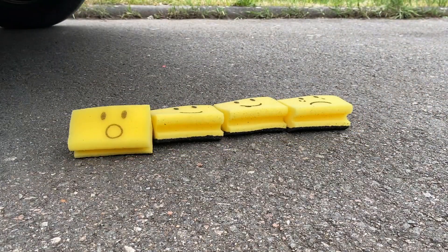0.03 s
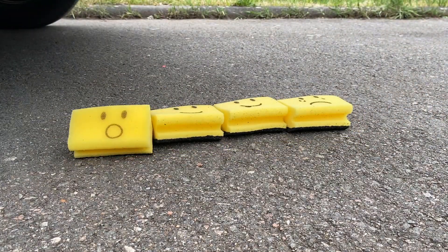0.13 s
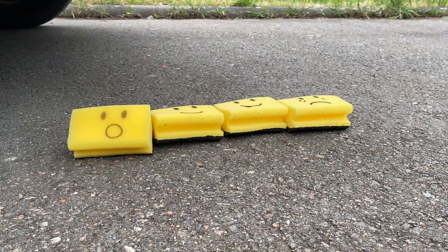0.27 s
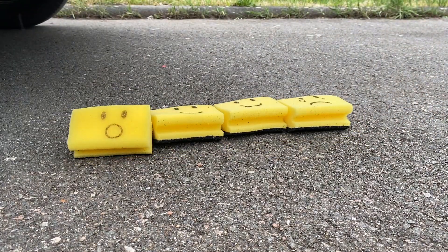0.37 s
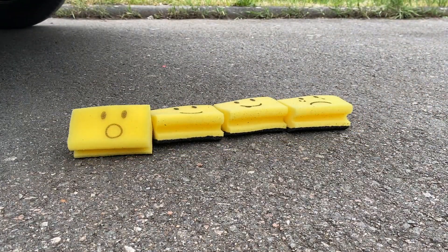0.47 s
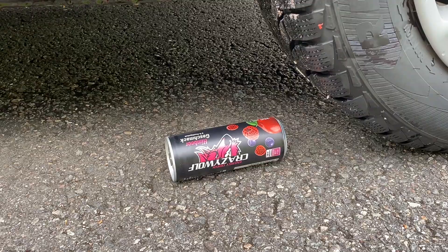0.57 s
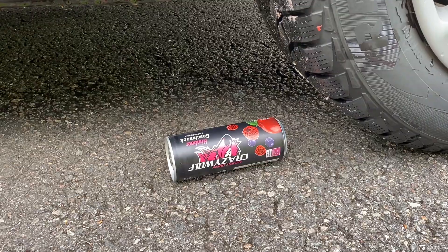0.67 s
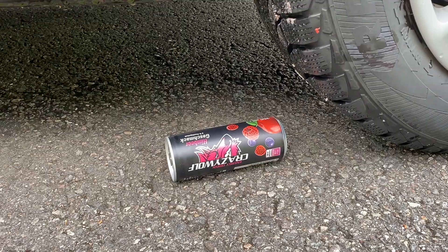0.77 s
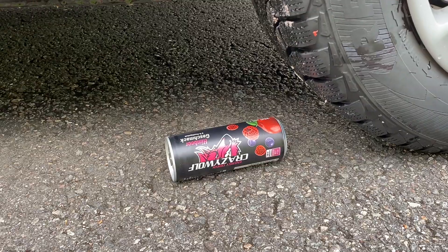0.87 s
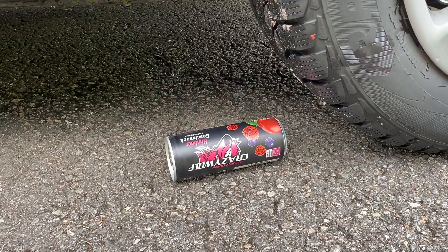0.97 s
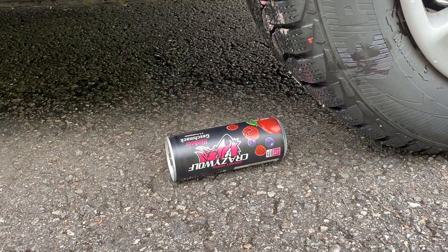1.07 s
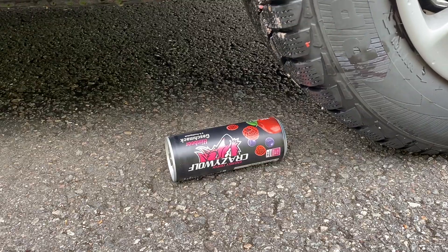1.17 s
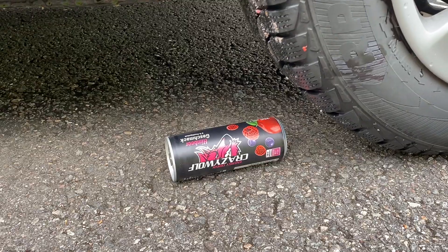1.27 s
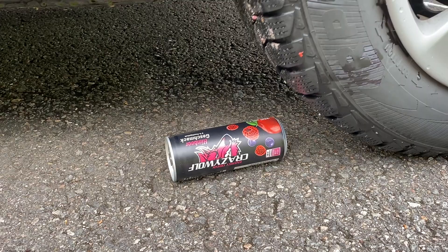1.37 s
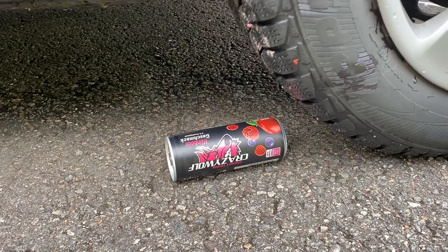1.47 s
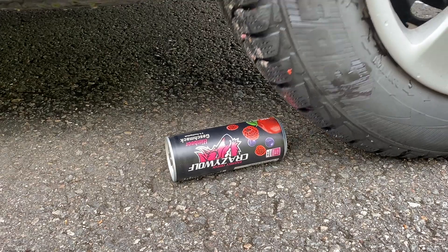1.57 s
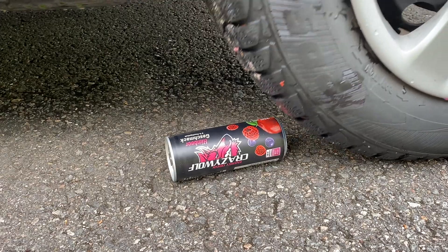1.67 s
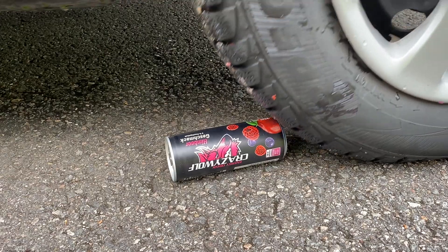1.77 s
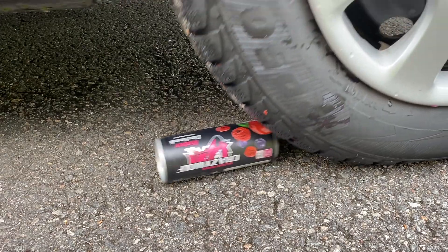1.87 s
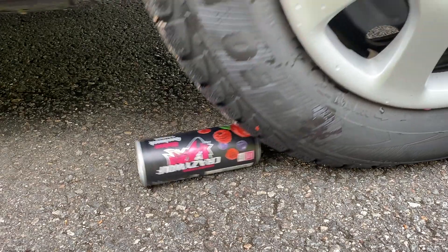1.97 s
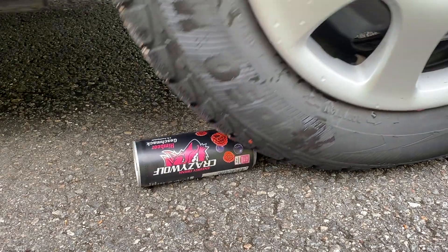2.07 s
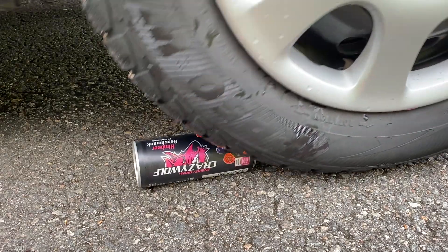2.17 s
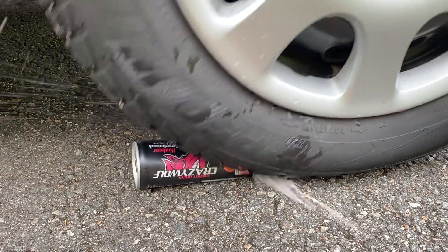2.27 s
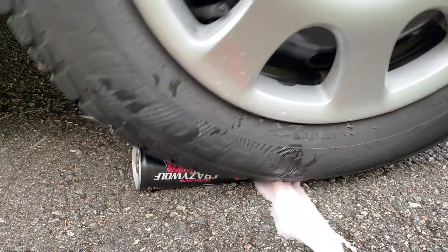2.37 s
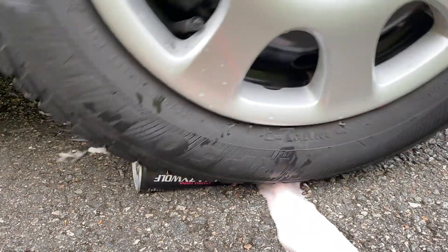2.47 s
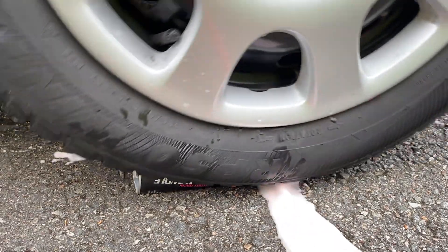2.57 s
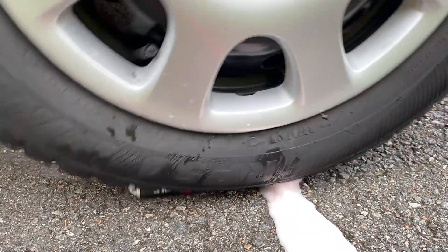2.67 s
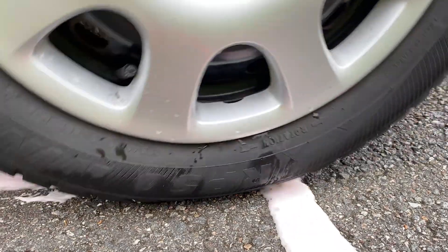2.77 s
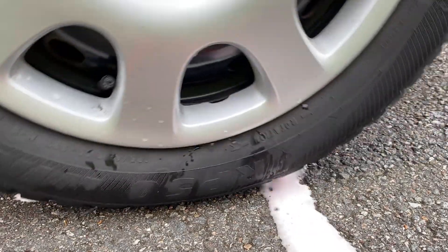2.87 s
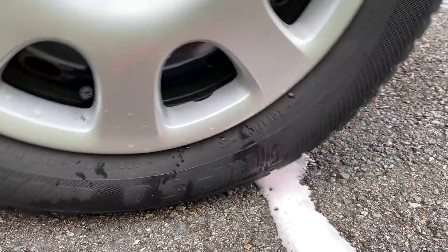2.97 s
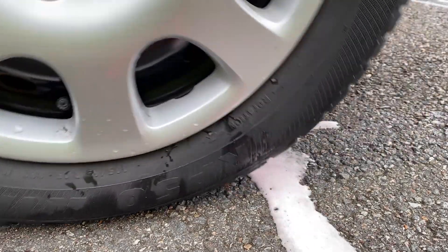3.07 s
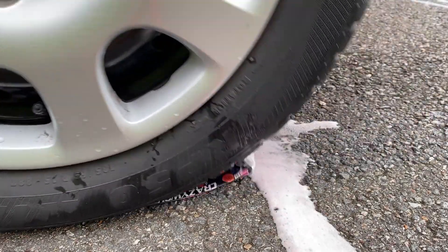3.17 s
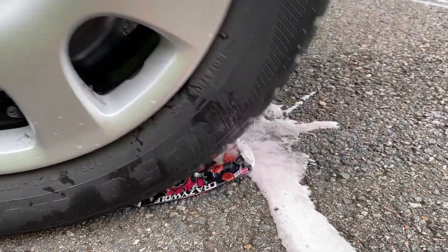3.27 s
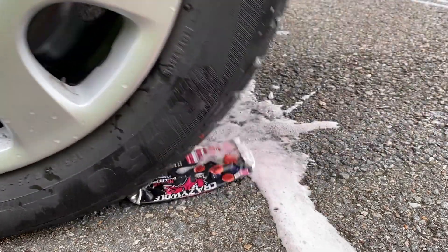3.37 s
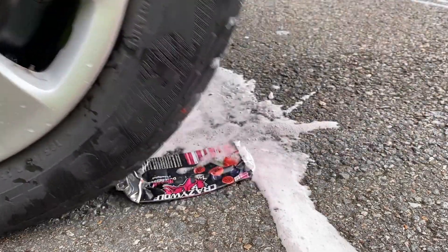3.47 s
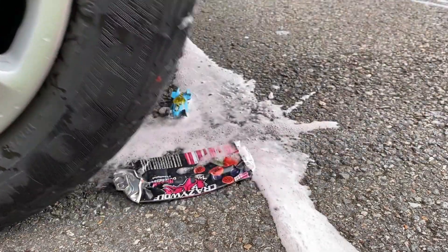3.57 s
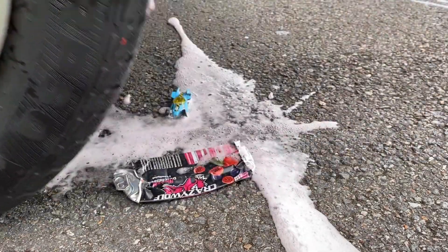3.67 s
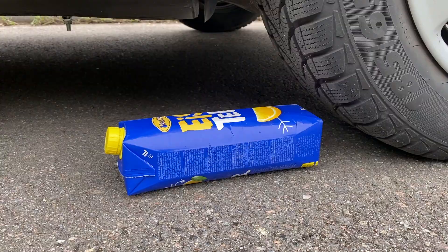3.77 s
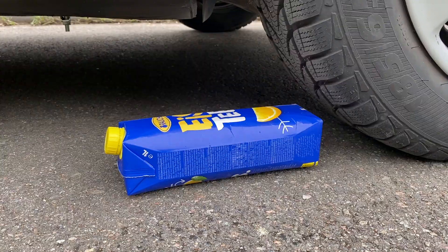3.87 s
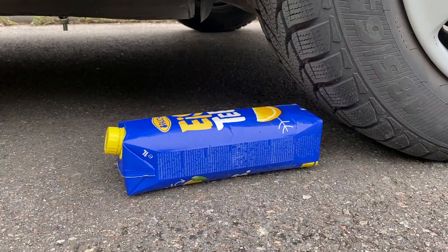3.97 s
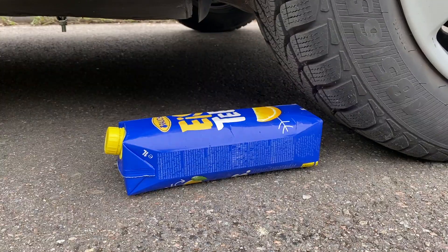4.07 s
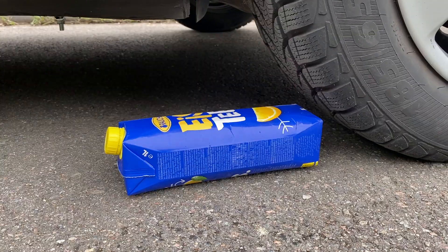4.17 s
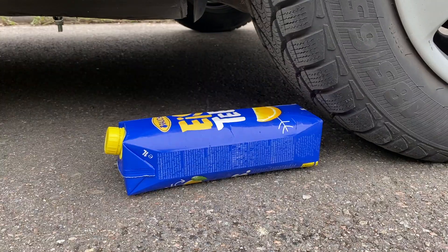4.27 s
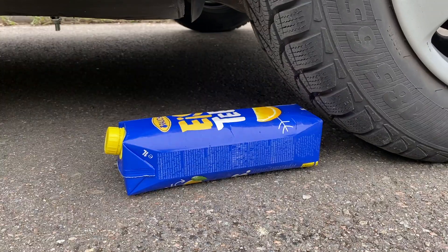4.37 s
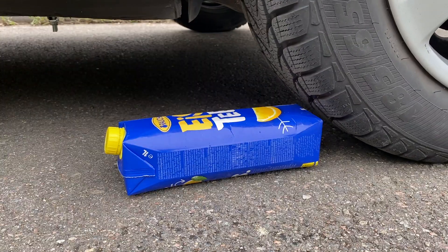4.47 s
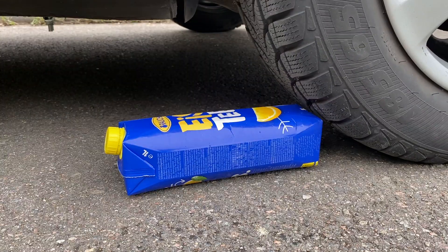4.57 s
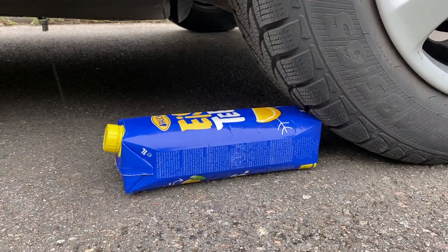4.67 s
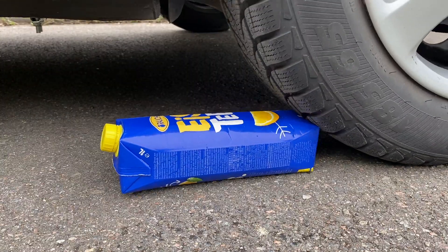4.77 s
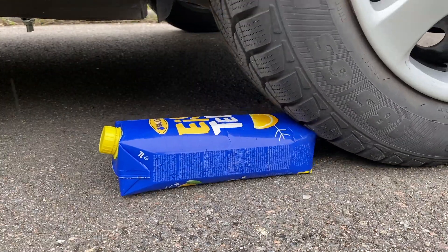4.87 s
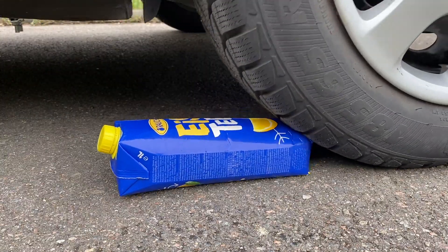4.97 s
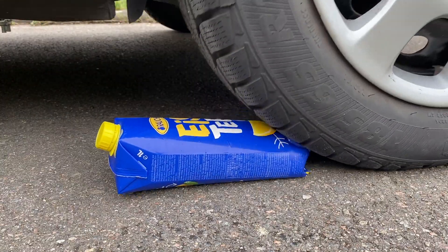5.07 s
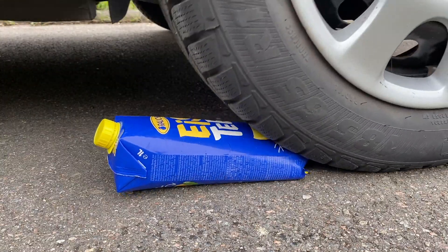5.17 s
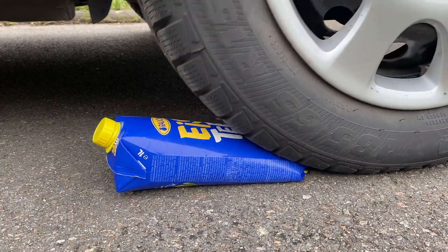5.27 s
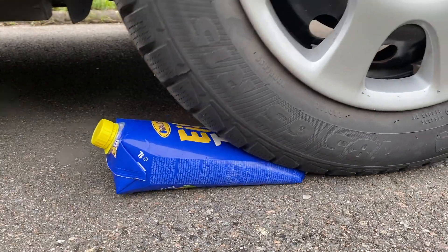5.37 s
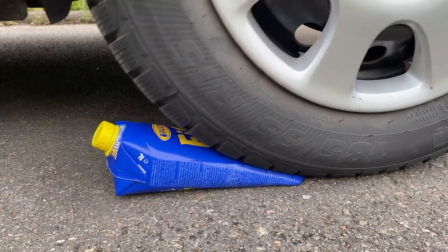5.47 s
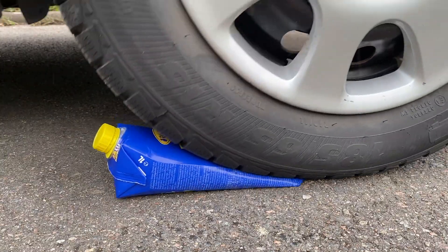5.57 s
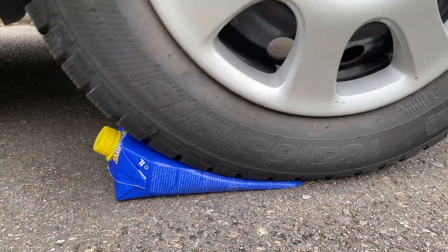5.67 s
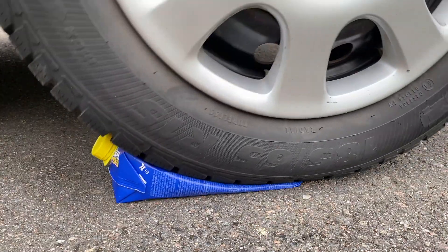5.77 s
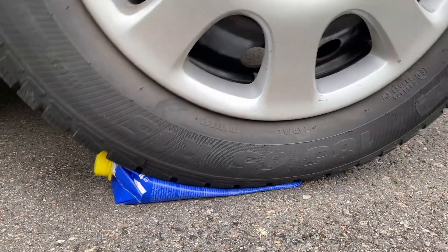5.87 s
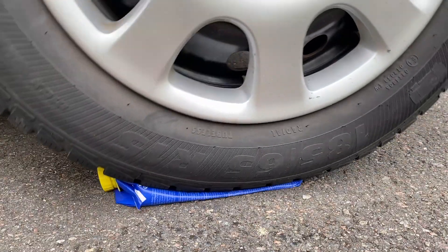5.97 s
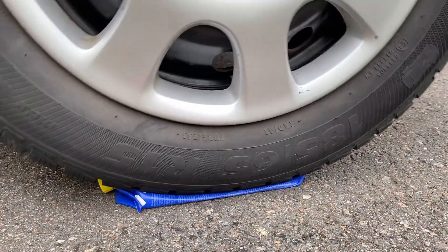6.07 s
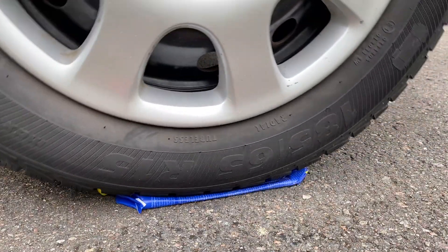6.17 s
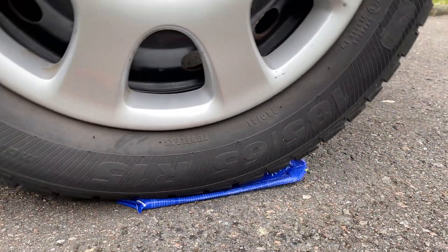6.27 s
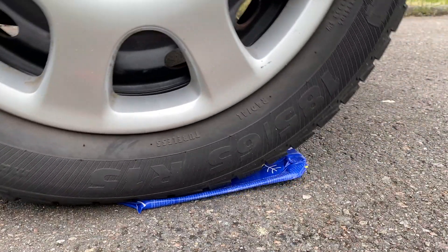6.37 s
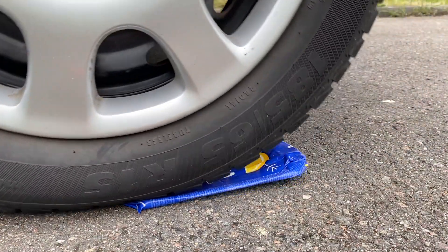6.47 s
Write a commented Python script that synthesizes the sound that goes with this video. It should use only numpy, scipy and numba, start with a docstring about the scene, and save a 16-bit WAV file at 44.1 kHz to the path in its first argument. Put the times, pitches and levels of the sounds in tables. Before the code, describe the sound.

Outdoors on asphalt, close to a phone, a car idles with a low throbbing exhaust and soft valve clatter. A tyre crushes a full metal can in ringing crunches, deep pops and short wet sprays. After an abrupt shot change, a carton ticks and creaks, then its air rushes out in hiss and wavering whistles, ending in sharp cracks.

```python
"""Car crushing a can and a carton

An idling car creeps over a full drink can, then an empty carton, a metre from a phone on the asphalt.
Each can fold is ringing wall modes, a thud and a crack; falling thumps and droplet noise burst out.
The carton's creases crack and its air escapes as hiss and whistles through a leak.
Behind them, firings ring the exhaust, valves clatter and grit and foam fizz; the car's sound shifts
at about 0.6 and 3.8 s, as three shots follow each other."""
import sys
import numpy as np
from scipy import signal
from scipy.fft import rfft, irfft, next_fast_len
from scipy.io import wavfile
from scipy.ndimage import uniform_filter1d
from numba import njit

SR = 44100
rng = np.random.default_rng(int(sys.argv[2]) if len(sys.argv) > 2 else 0)


def bounce(signal):
    """Save signal as a 16-bit WAV file at the path given by the first command-line argument."""
    frames = np.transpose(np.atleast_2d(signal))
    limited = np.clip(frames, -1, 1)
    pcm = np.round(limited * 32767).astype(np.int16)
    wavfile.write(sys.argv[1], SR, pcm)


N = 287532
SIZE = next_fast_len(N, True)
T, HZ = np.arange(N) / SR, np.fft.rfftfreq(SIZE, 1 / SR)  # time of each sample, pitch of each spectral bin


def undb(db):
    """Turn decibels into a gain."""
    return 10 ** (np.asarray(db) / 20)


def unit(x):
    """Scale to an rms of 1."""
    return x / np.sqrt(np.mean(x ** 2))


def peak(x):
    """Scale to a highest point of 1."""
    return x / abs(x).max()


def curves(table):
    """Turn each column after the time into a curve, one value a sample."""
    s, *rest = np.transpose(table)
    return [np.interp(T, s, column) for column in rest]


def along(points, log=True):
    """Read (pitch_hz, value) points at every spectral bin."""
    f, value = np.transpose(points)
    return np.interp(np.log(HZ + 1), np.log(f + 1), value) if log else np.interp(HZ, f, value)


def colour(x, points, lo_hz, hi_hz):
    """Shape the spectrum, with rms 1 counted inside the band lo-hi."""
    spectrum = rfft(x, SIZE) * undb(along(points))
    inside = spectrum[(HZ > lo_hz) & (HZ < hi_hz)]
    return irfft(spectrum, SIZE)[:N] / (np.sqrt(2 * np.sum(abs(inside) ** 2)) / SIZE)


@njit
def svf(x, hz, width):
    """State-variable band-pass with a moving centre, gain 1 there."""
    y, b, l = np.empty(len(x)), 0., 0.
    for i in range(len(x)):
        g, k = np.tan(np.pi * hz[i] / SR), width / hz[i]
        v = (b + g * (x[i] - l)) / (1 + g * (g + k))
        b, l, y[i] = 2 * v - b, l + 2 * g * v, k * v
    return y


def band(x, hz, width):
    """Band-pass at a fixed or moving pitch."""
    return svf(x, np.zeros(len(x)) + hz, float(width))


def band_twice(x, hz, width, second_width):
    """Two band-passes in a row, for steeper sides."""
    return band(band(x, hz, width), hz, second_width)


def noise_band(hz, width, second_width, samples=N):
    """A band of noise with rms 1."""
    return unit(band_twice(rng.standard_normal(samples), hz, width, second_width))


def walk(rate):
    """Smooth random wander with rms 1: levels held 1 / rate seconds and smoothed twice."""
    k = int(SR / rate)
    steps = np.repeat(rng.standard_normal(N // k + 1), k)
    return unit(uniform_filter1d(uniform_filter1d(steps, k), k)[:N])


def grains(rate, spread_db, tail_s):
    """Noise whose level jumps with random tiny bursts that die away."""
    kicks = (rng.random(N) < rate / SR) * undb(spread_db * rng.exponential(size=N))
    bursts = signal.lfilter([1], [1, -np.exp(-1 / (tail_s * SR))], kicks)
    return unit(rng.standard_normal(N) * (1 + bursts))


def while_on(start, end, edge_s):
    """1 from start to end, with short ramps inside the ends."""
    return np.clip(np.minimum(T - start, end - T) / edge_s, 0, 1)


def bumps(rows):
    """Sum of smooth swells or dips (centre_s, change_db, half_length_s)."""
    return sum(db * np.cos(np.pi / 2 * np.clip((T - s) / half, -1, 1)) ** 2 for s, db, half in rows)


def buckle(events, modes, fold_t60, sharp_thud_db, thud_gain, top_share_db, wide, reach,
           crack_share, boost_db, snap_db):
    """Each fold rings the wall modes near its centre, pushes air as a thud and cracks as a noise burst."""
    out, t = np.zeros(N + 3000), T[:3000]
    f, mode_db, ring_s = (column[:, None] for column in np.transpose(modes))
    for s, peak_db, hz, crack_db, crack_hz in events:
        thud_db = sharp_thud_db - thud_gain * crack_db  # dull, wide folds push more air
        # High cracks reach further into the top.
        top_db = crack_db + top_share_db + 8 * np.log2(crack_hz / 4000)
        t60 = fold_t60 + .002 * peak_db  # weak folds die sooner
        fade = undb(-60 * t / max(t60, .011))
        chance, noise = rng.standard_normal((3, len(modes), 1)), rng.standard_normal((2, len(t)))

        # Folds above -12 dB drop in pitch, nearer to 30 % the stronger they are.
        sag, sag_s = .3 * np.clip(1 - peak_db / -12, 0, 1), .006
        bent_t = (1 - sag) * t + sag * sag_s * (1 - np.exp(-t / sag_s))  # time as the sagging modes count it
        distance = np.log2(f / hz)  # octaves from the fold's centre
        gain = np.sign(chance[2]) * undb(mode_db + 3.4 * chance[0] - reach * distance ** 2)
        tones = np.sin(2 * np.pi * f * (1 + 0.065 * chance[1]) * bent_t)
        ring = np.sum(gain * tones * undb(-60 * t / ring_s), axis=0)
        rustle = band_twice(noise[0] * fade, hz, 0.51 * hz, 1.5 * hz)
        ring = peak(ring) * fade + 0.47 * peak(rustle)
        ring *= 1 - np.exp(-t * hz / 0.27)  # the fold takes part of a cycle to travel

        thud_hz = np.array([[120], [290]]) * (1 + 0.26 * np.tanh(chance[2, :2]))
        thud = np.sin(2 * np.pi * thud_hz * t).sum(axis=0)
        thud *= 0.99 * (1 - np.exp(-t / 0.0019)) * undb(-60 * t / 0.048)

        snap = noise[1] * (undb(-60 * t / .0045) + crack_share * fade ** .8)
        snap[0] = 5 * np.sign(chance[0, 0, 0])  # a tick opens the snap
        crack = peak(band_twice(snap, crack_hz, wide * crack_hz, 2 * wide * crack_hz))
        top = peak(band(band(snap, 11400, 8400), 11700, 9100))

        one = peak(ring) + undb(thud_db) * thud + undb(crack_db + snap_db) * crack
        one += undb(top_db + snap_db + 6.5) * top
        start = int((s + 0.000995) * SR)  # the fold sounds 1 ms after its listed time
        out[start:start + len(t)] += undb(peak_db + boost_db) * one
    return out[:N]


def can_folds():
    """The can's thin metal wall buckles and rings."""
    # Folds, levels before the gains below: start_s, ring_peak_db, ring_centre_hz,
    # crack_db (against the ring), crack_centre_hz
    dents = [(1.967, -37, 515, 0, 4180), (1.998, -35, 673, 2, 5400), (2.028, -9, 820, -3, 2200),
             (2.048, -27, 646, 2, 5870), (2.136, -22.5, 800, -19, 4210), (2.2105, -5.5, 900, -17, 2407),
             (2.218, -11, 816, -10, 2930), (2.221, -12, 1000, -8, 3910), (2.279, -24, 680, -20, 2500),
             (2.307, -27, 1350, -25, 2500), (2.314, -22, 1290, -20, 2400), (2.333, -26, 1540, -11, 7230),
             (2.343, -25, 1480, -22, 2500), (2.36, -26, 1490, -22, 2500), (2.383, -26, 1560, -8, 2400),
             (2.401, -31, 896, 2.5, 3500), (2.423, -28, 1200, -15, 2600), (2.432, -18.5, 1190, -13, 2930),
             (2.477, -12, 1200, -1, 3500), (2.508, -15, 1100, -3, 5260), (2.522, -20, 1700, -7, 2470),
             (2.571, -24, 1010, -20, 2400), (2.594, -11, 700, -24, 2500), (2.605, -5.5, 680, -24, 6260),
             (2.61, -7, 1000, -28, 3140), (2.614, -13, 805, -22, 2410), (2.625, -10, 700, -16, 2200),
             (2.6675, -7, 760, -7, 4000), (2.675, -13, 900, 0, 7100), (2.71, -24, 900, -12, 2500),
             (2.745, -19, 1686, 3, 3000), (2.784, -28, 1419, -24, 2400), (2.806, -22, 1100, -15, 3320),
             (2.832, -20.5, 1220, -3.5, 3570), (2.859, -16, 1210, -3.5, 3533), (2.88, -32, 1200, -15, 2500),
             (2.884, -38, 1750, 3, 5600), (2.941, -24, 1300, 2, 5000), (2.954, -32, 1750, -5, 2300),
             (2.961, -19, 1750, 5, 3600), (2.992, -28, 1000, -0.5, 3140), (3.016, -25.5, 1010, -18, 2500),
             (3.021, -17, 1181, -4, 3200), (3.066, -25, 1300, -8, 2370), (3.095, -43, 1750, 4, 4200),
             (3.135, -19.5, 937, -18, 2330), (3.146, -22.5, 850, -6.5, 2830), (3.155, -23, 790, -14, 3050),
             (3.166, -25, 900, -15, 2750), (3.175, -22.5, 1000, -8, 2394), (3.181, -25, 1100, -10, 2400),
             (3.296, -23, 1750, -11, 1900)]
    # Wall modes, before random scatter: pitch_hz, level_db, ring_t60_s
    can_modes = [(406, -7, 0.043), (636, 0, 0.07), (792, 0.5, 0.08), (1040, -3, 0.035), (1220, 1, 0.056),
                 (1480, -3, .04), (1750, -8, .05), (2350, 0, 0.049), (2900, -19, .05)]
    return buckle(dents, can_modes, fold_t60=.062, sharp_thud_db=-23, thud_gain=.4, top_share_db=-9.5,
                  wide=.85, reach=8., crack_share=.13, boost_db=2.1, snap_db=6.5)


def whumps():
    """Big blows squeeze out air: each starts as a quick swing and slides down to a low one."""
    # Blows: start_s, level_db, start_pitch_hz, length_s
    blows = [(2.212, -7, 700, .0115), (2.5945, -8, 850, .0045), (2.6068, -9.5, 760, .011),
             (2.6262, -9, 720, .006), (2.669, -8, 800, .010)]
    end_hz, after_swing_db = 85, -11
    out, t = np.zeros(N), T[:3000]
    for s, db, hz, length in blows:
        fall_s = .4 * length
        turns = end_hz * t + (hz - end_hz) * fall_s * (1 - np.exp(-t / fall_s))
        blow = np.exp(-(t / length) ** 4)
        after_swing = undb(after_swing_db) * (1 - blow) * np.exp(-(t / (2.5 * length)) ** 2)
        start = int(s * SR)
        out[start:start + len(t)] -= undb(db) * (blow + after_swing) * np.sin(2 * np.pi * turns)
    return out


def burst(s, db, fall_db_s):
    """Level of one spurt: a 4 ms rise, then a steady fall in dB."""
    return np.clip((T - s) / .004, 0, 1) * undb(db - fall_db_s * np.maximum(T - s, 0))


def spray():
    """Drink hisses out as droplets, gurgles and sloshes in the crumpling can, and foam seethes."""
    # Drink spurting from the split can: start_s, spray_db, spray_fall_db_per_s, gurgle_db
    spurt_rows = [(2.029, -27, 600, -27), (2.216, -21, 450, -15.5), (2.478, -29, 700, -28),
                  (2.506, -36, 300, -30), (2.669, -27, 170, -25)]
    # Colour of the droplet hiss: pitch_hz, level_db (per Hz)
    spray_colour = [(1500, -3), (3000, 0.5), (7000, -1.5), (11000, -2), (16000, -4)]
    hiss = colour(grains(540, 1.8, 0.002), spray_colour, 2900, 7700)
    spurts = sum(burst(s, db, fall) for s, db, fall, _ in spurt_rows)
    spurts = spurts * np.clip((2.76 - T) / .01, 0, 1)  # the spray ends at 2.76 s

    gurgle = unit(band(grains(300, 1.6, 0.0014), 1150 * undb(1.6 * walk(30.2)), 800))
    gurgles = sum(burst(s, db, 320) for s, _, _, db in spurt_rows)
    slosh = while_on(2.22, 2.72, .03) * undb(-40 + 3 * walk(14))  # while the can is under the tyre

    foam = unit(band(grains(400, 1.2, .001), 2200, 1200))
    seethe = while_on(2.4, 2.6, .04) * undb(-41.5 + 2.5 * walk(25)) * foam
    return seethe + spurts * hiss + (slosh + gurgles) * gurgle


def carton_folds():
    """The carton's creases and cap give way, with duller and shorter ringing."""
    # Folds, levels before the gains below: start_s, ring_peak_db, ring_centre_hz,
    # crack_db (against the ring), crack_centre_hz
    creases = [(4.667, -23, 600, -20, 2800), (4.679, -24, 700, -15, 5500), (4.698, -25, 800, 0, 3200),
               (4.744, -37, 681, 0, 6700), (4.873, -32, 746, -8, 1700), (4.927, -33, 1797, -1, 2633),
               (4.934, -26, 859, 1, 2382), (5.952, -21, 980, 0, 6910), (6.065, -37, 877, 1, 7000),
               (6.166, -28, 1130, 13, 5190), (6.192, -31, 676, -9, 4084), (6.207, -20, 600, 1, 5400),
               (6.211, -19, 800, -12, 4364), (6.345, -39, 689, 5, 7000), (6.463, -22, 776, 7, 5800)]
    # Wall modes, before random scatter: pitch_hz, level_db, ring_t60_s
    carton_modes = [(405, 5, 0.06), (725, 1.5, 0.0083), (920, 6, 0.021), (1400, -17, .015),
                    (2170, 13, .012)]
    return buckle(creases, carton_modes, fold_t60=.058, sharp_thud_db=-18, thud_gain=.3, top_share_db=-17,
                  wide=.55, reach=4.7, crack_share=.06, boost_db=2.14, snap_db=10.5)


def jet():
    """Air forced from the carton turns turbulent in a flapping leak and hisses."""
    # Air jet, with last puffs as the creases give, before the hiss gains: start_s, level_db
    jet_rows = [(5.12, -58), (5.276, -43), (5.322, -29), (5.374, -27), (5.46, -36), (5.7, -35),
                (5.736, -37), (5.78, -31), (5.836, -24), (5.896, -26), (5.93, -37.5), (5.96, -36),
                (5.995, -50), (6.006, -35.5), (6.045, -40), (6.07, -47), (6.16, -56), (6.169, -34),
                (6.19, -48), (6.208, -50), (6.213, -34), (6.235, -48), (6.3, -60)]
    # Colour of the main hiss: pitch_hz, level_db (per Hz)
    jet_colour = [(400, -12), (800, -3), (1500, -9), (2900, -4), (3500, -6.5), (4400, -2), (6000, -0.5),
                  (8000, 1), (10000, -16)]
    # Colour of the top of the hiss: pitch_hz, level_db (per Hz)
    jet_top_colour = [(6000, -12.5), (9000, 1), (13500, -2), (16000, -2)]
    # As the leak widens the top of the hiss fades and its centre sinks.
    widening_s = (5.76, 5.95)
    top_db = -1 + np.interp(T, widening_s, [0, -12]) + 2.5 * walk(20)
    hz = np.interp(T, widening_s, [6300, 5200]) * undb(.8 * walk(15))
    low = colour(grains(200, 0.8, 0.00045), jet_colour, 3020, 8400)
    low = low + 0.6 * unit(band(rng.standard_normal(N), hz, 1500))
    top = colour(grains(200, 0.93, 0.00055), jet_top_colour, 10460, 11870)
    level = undb(curves(jet_rows)[0] + 1.26 * walk(60))
    return while_on(jet_rows[0][0], jet_rows[-1][0], 0.06) * level * (0.78 * low + undb(top_db) * top)


def whistles():
    """The leak's edge whistles: a wavering sine gives way to a band of noise as it gets rougher."""
    # Three whistles, then a rough lower branch of the last: start_s, pitch_hz, level_db, roughness (0-1)
    whistle_tables = [
        [(5.335, 1330, -44, .8), (5.352, 1550, -33, .5), (5.37, 1830, -41, .9), (5.387, 1780, -36, .6),
         (5.399, 1350, -32, .35), (5.413, 1300, -31.5, .3), (5.42, 1180, -33, .4), (5.432, 1140, -44, .4)],
        [(5.433, 1750, -37, .95), (5.46, 1380, -38, 1), (5.51, 1450, -36.5, .8), (5.534, 1400, -32, .3),
         (5.543, 1335, -35, .3), (5.558, 1413, -31, .3), (5.61, 1389, -33, .45), (5.63, 1550, -35, .6),
         (5.652, 1470, -34, .55), (5.68, 1450, -34, .6), (5.693, 1580, -35, .65), (5.705, 1450, -34, .55),
         (5.722, 1390, -33, .6), (5.736, 1394, -33, .4), (5.748, 1300, -46, .5)],
        [(5.805, 4500, -36, 1), (5.817, 4400, -28, .9), (5.824, 3950, -26, .85), (5.836, 3950, -24, .75),
         (5.848, 3750, -25, .8), (5.858, 3350, -27.5, .6), (5.868, 2720, -29.5, .35), (5.888, 2670, -31, .35),
         (5.9, 2300, -44, .8)],
        [(5.815, 3600, -36, 1), (5.826, 3500, -29, 1), (5.843, 3350, -27.5, .95), (5.856, 3300, -36, 1)],
    ]
    out = np.zeros(N)
    waver, flutter, air = walk(160), undb(2.1 * walk(90)), rng.standard_normal(N)
    for table in whistle_tables:
        pitch, level_db, rough = curves(table)
        sine = np.sqrt(2) * np.sin(2 * np.pi * np.cumsum(pitch * (1 + .03 * rough * waver)) / SR)
        frayed = unit(band_twice(air, pitch, .17 * pitch.mean(), .3 * pitch.mean()))
        tone = np.sqrt(1 - rough ** 2) * sine + rough * frayed
        out += while_on(table[0][0], table[-1][0], 0.005) * undb(level_db) * flutter * tone
    return out


def firing():
    """Engine speed and the count of firings so far, with a slight random unsteadiness."""
    # The engine sags as the tyre climbs each object: start_s, firing_rate_hz
    firing_rows = [(0, 25.6), (.59, 24.75), (.61, 24), (1.5, 24.4), (1.66, 22.5), (2.24, 22.4), (2.5, 23.3),
                   (2.74, 22.2), (2.78, 33.4), (3.398, 38.4), (3.6, 37.5), (3.79, 34.3), (3.81, 25.4),
                   (4.34, 25.4), (4.56, 24.2), (4.7, 22.1), (5.11, 21.85), (5.51, 25.05), (5.68, 26.17),
                   (6.52, 25.4)]
    hz = curves(firing_rows)[0]
    return hz, np.cumsum(hz * (1 + 0.0038 * walk(12))) / SR


def exhaust_levels():
    """Levels of the three pipe modes; the third follows part of the boom's swing."""
    # The exhaust boom, before later trims: start_s, level_db
    boom_rows = [(0, -31), (.48, -31.5), (.59, -39), (.61, -28), (1.16, -34), (1.32, -28.5), (1.5, -31),
                 (1.68, -39), (1.92, -52), (2.02, -32), (2.93, -30), (3.79, -30), (3.81, -35), (4.1, -29.5),
                 (4.34, -33.5), (4.68, -32), (4.88, -41), (5.06, -35), (5.24, -25), (5.3, -18.5),
                 (5.51, -23.5), (5.6, -28.5), (6.52, -28.5)]
    # The boom briefly drops out or surges: centre_s, change_db, half_length_s
    swings = [(.268, -12, .05), (2.24, 5, .05), (2.33, -10, .06), (2.42, -30, .05), (2.54, -10, .05),
              (2.63, 11, .07), (2.76, -22, .07), (3.73, 11.5, .06), (4.79, -22, .1), (5.05, -8, .03),
              (5.86, -11, .06)]
    # The second mode, up when the engine pulls, before later trims: start_s, level_db
    second_rows = [(0, -51), (1.5, -53), (1.76, -46), (2.6, -43), (2.9, -54), (3.4, -48), (3.78, -44),
                   (3.82, -58), (4.7, -57), (5.03, -43), (5.28, -34), (5.75, -32), (6.52, -38)]
    # The third mode swells when the engine pulls: centre_s, change_db, half_length_s
    third_swells = [(3.5, 3.5, .3), (5.6, 3.5, .9)]
    boom = curves(boom_rows)[0] + bumps(swings)
    third = -39.5 + .45 * (boom - -30) + bumps(third_swells)  # -39.5 dB when the boom is at -30 dB
    return boom, curves(second_rows)[0], third


def exhaust(hz, phase, mode_db):
    """Multiples (orders) of the firing rate hum in the pipe modes and car body, with rough gas noise."""
    # Pipe modes at idle: pitch_hz, width_hz, gas_roughness (share of noise)
    pipe_modes = [(70.2, 11.7, 0.16), (126.84, 25, 0.25), (245, 24, 0.62)]
    # Weaker resonances: pitch_hz, width_hz, level_db (against the third mode)
    side_modes = [(186, 18, -6.5), (310, 50, -12)]
    step, order = 16, np.arange(1, 17)[:, None]  # tones are worked out every 16 samples
    tones = np.sin(2 * np.pi * (order * phase[::step] + rng.random(order.shape)))

    def near(f, width):  # strength of each order in a resonance passed twice
        return 1 / (1 + (2 * (order * hz[::step] - f) / width) ** 2)

    body = np.interp(T, T[::step], np.sum(near(37, 13) * tones, axis=0))  # hums with the lowest orders
    out = undb(mode_db[0] - 6.5) * body
    for (f, width, rough), db, trim_db in zip(pipe_modes, mode_db, [.1, 2.1, .3]):
        f = f * (1 + .003 * (hz - 24))  # the modes rise with the firing rate
        weight = near(f[::step], width)
        hum = np.sum(weight * tones, axis=0) / np.sqrt(np.sum(weight ** 2, axis=0) / 2)
        gas = noise_band(f, width, 1.6 * width)
        out += undb(db + trim_db) * (np.interp(T, T[::step], hum) + rough * gas)

    # The eighth order stands out at any speed.
    out += undb(mode_db[2] - 9 + 2.1 * walk(13)) * np.sin(2 * np.pi * 8 * phase)
    for f, width, db in side_modes:
        out += undb(mode_db[2] + db) * noise_band(f, width, width)
    return out


def clatter_and_fizz(phase):
    """Valve clatter throbs once a firing; tyre grit and foam fizz as fine grains."""
    # One table per shot, before random wander: start_s, clatter_db, fizz_db
    clatter_tables = [
        [(0, -47, -66), (.59, -47.5, -74)],
        [(.61, -44, -59.5), (1.8, -44, -59.5), (1.85, -42, -53), (2.8, -44, -54), (3.3, -43, -54),
         (3.79, -45.5, -54.5)],
        [(3.81, -41.5, -59.5), (4.6, -42, -59.5), (4.8, -40.5, -57), (5.9, -48, -67), (6.52, -41.5, -58.5)],
    ]
    # Colour of the clatter: pitch_hz, level_db (per Hz)
    clatter_colour = [(20, -4), (60, 5.5), (200, 4.5), (450, -4), (800, -3), (1300, -8), (1750, -7),
                      (2200, -11.5), (2900, -11), (3500, -19.5), (5000, -16.5), (7000, -30.5),
                      (10700, -23.5), (16000, -61)]
    # Colour of the fizz: pitch_hz, level_db (per Hz)
    fizz_colour = [(1000, -4), (3000, -6), (8000, 3.5), (12000, 0.5), (16000, -1)]
    clatter_db, fizz_db = curves(np.vstack(clatter_tables))
    throb = 1 + .22 * np.exp(-(phase % 1) / 0.34)
    clatter = colour(throb * grains(60, 1.16, 0.0017), clatter_colour, 660, 2000)
    fizz = colour(grains(150, 1.9, 0.00064), fizz_colour, 10230, 12090)
    return undb(clatter_db + 0.83 * walk(9)) * clatter + undb(fizz_db + .8 * walk(18)) * fizz


def drones():
    """Narrow bands of noise that fade in and out; the narrowest hold a steady tone."""
    # Faint hums from engine bay and panels: start_s, end_s, pitch_hz, width_hz, level_db (of the noise)
    drone_rows = [(3.1, 3.79, 626, 14, -49), (.55, 1.35, 1740, 16, -58), (.61, 1.4, 1050, 20, -62),
                  (.61, 2, 760, 70, -54), (.61, 1.5, 393, 14, -56), (3.81, 4.45, 2830, 70, -58),
                  (3.81, 4.65, 1990, 60, -59), (3.81, 4.2, 1330, 30, -62), (3.81, 5.2, 820, 80, -53),
                  (3.81, 4.6, 393, 14, -53), (3.81, 4.6, 2310, 40, -62)]
    out = np.zeros(N)
    for start, end, f, width, db in drone_rows:
        span = slice(int(start * SR), int(end * SR))
        hum = noise_band(f, width, width, len(T[span]))
        steady = max(1.6 - width / 12, 0) * np.sin(2 * np.pi * f * T[span])
        out[span] += while_on(start, end, 0.043)[span] * undb(db) * (hum + steady)
    return out


def engine(hz, phase, mode_db):
    """The whole car: exhaust, drones, clatter and fizz."""
    return exhaust(hz, phase, mode_db) + drones() + clatter_and_fizz(phase)


def ports(x, scattered, lead, wet):
    """Two microphone ports: a level and phase offset, plus scattered sound that reaches the right only."""
    # In the treble the channels fall out of step and back twice: pitch_hz, left_lead_half_turns
    treble_lead = [(7400, 0), (8500, -1), (9500, -1), (10600, -2), (11900, -2), (12800, -3), (13900, -3),
                   (14700, -4)]
    # Balance: pitch_hz, left_minus_right_db
    balance = [(60, 0.5), (110, 0.5), (200, 1.0), (380, 2.5), (700, 5.0), (1290, 1.5), (2380, 2.5),
               (4400, 4.0), (8120, 0.5), (15000, 0.0)]
    # Unrelated sound left and right, before the wet factor: pitch_hz, share (0-1)
    diffuse = [(60, 0.06), (125, 0.22), (250, 0.42), (600, 0.84), (1200, 0.64), (2000, 0.44), (5000, 0.65),
               (8300, 0), (9700, 0), (11200, .3), (12700, 0), (14000, 0), (15200, .3)]
    share = np.clip(wet * along(diffuse), 0, 1)
    turn = np.exp(-1j * np.pi * (along(lead, False) + along(treble_lead, False)))
    tilt = undb(along(balance) / 2)
    direct = rfft(x, SIZE)
    right = np.sqrt(1 - share ** 2) * turn * direct + share * rfft(scattered, SIZE)
    return irfft(np.array([direct * tilt, right / tilt]), SIZE)[:, :N]


def scene():
    """Mix the crushing under the wheel with the car, each placed left and right."""
    # Phase of the wheel sounds: pitch_hz, left_lead_half_turns
    wheel_lead = [(0, 0.019), (1400, 0.21), (2500, 0.37), (4500, 0.18), (7400, 0.019)]
    # Phase of the car: pitch_hz, left_lead_half_turns
    engine_lead = [(0, 0), (350, 0), (1200, 1), (2100, 1.59), (2800, 2.5), (4100, 2), (7400, 2)]
    wheel = can_folds() + whumps() + spray() + carton_folds() + jet() + whistles()
    echoes = rng.standard_normal(1500) * np.exp(-T[:1500] / 0.003)  # off tyre, rim and asphalt
    scattered = signal.fftconvolve(wheel, echoes / np.linalg.norm(echoes))[:N]

    hz, phase = firing()
    mode_db = exhaust_levels()
    # A second run of the car, with its own noise, is its scattered sound.
    car = ports(engine(hz, phase, mode_db), engine(hz, phase, mode_db), engine_lead, 1)
    return car + ports(wheel, scattered, wheel_lead, .8)


def record(dry):
    """The phone rounds the loudest peaks and cuts the top above 15800 Hz."""
    rounded = np.tanh(1.116 * dry) / 1.084
    return signal.sosfilt(signal.ellip(8, .2, 60, 15800, fs=SR, output="sos"), rounded)


dry = scene()
out = record(dry)
bounce(out)
```